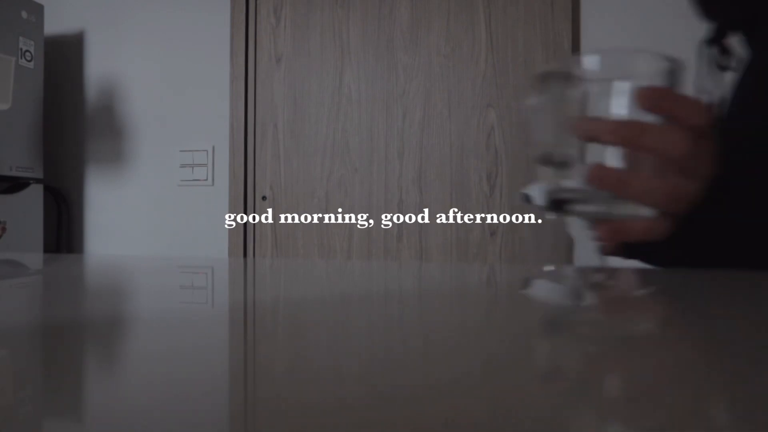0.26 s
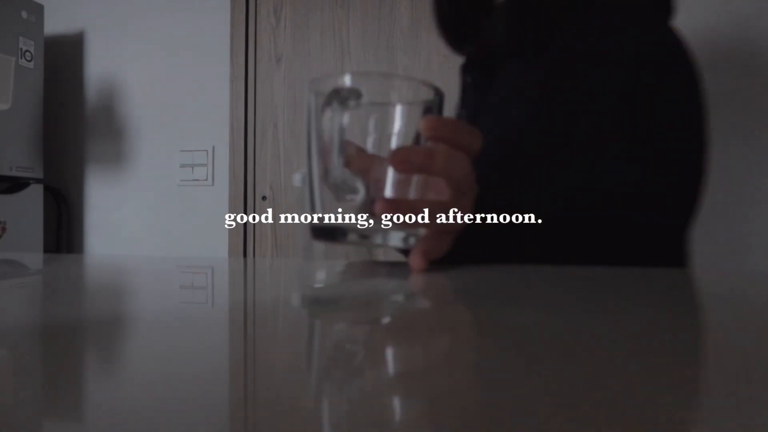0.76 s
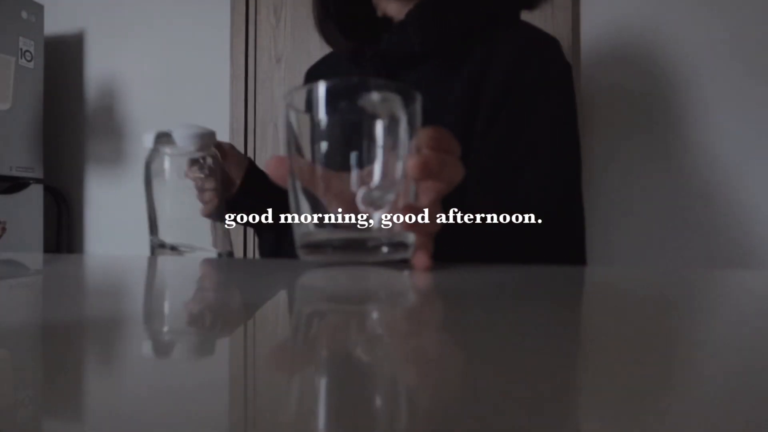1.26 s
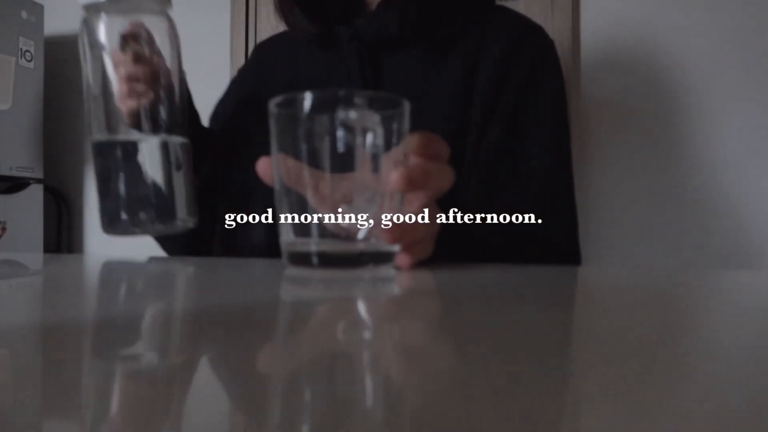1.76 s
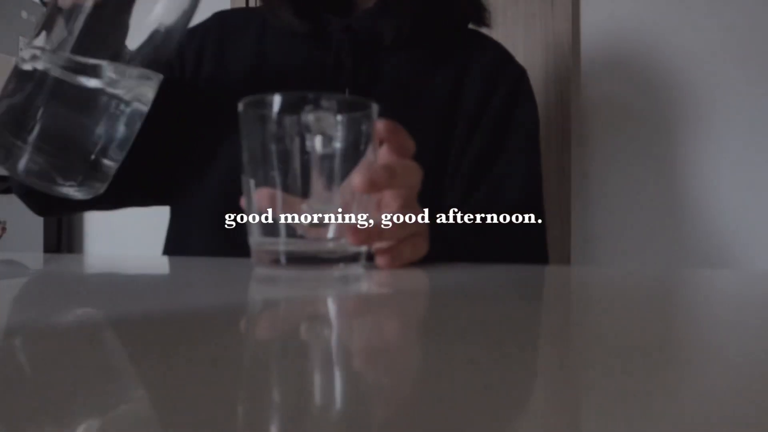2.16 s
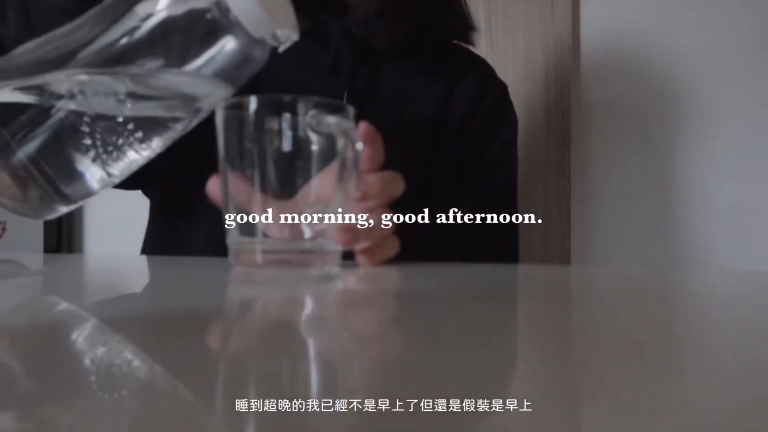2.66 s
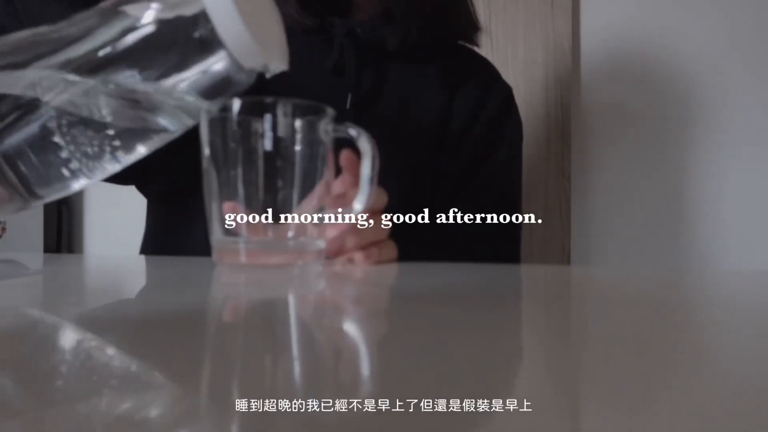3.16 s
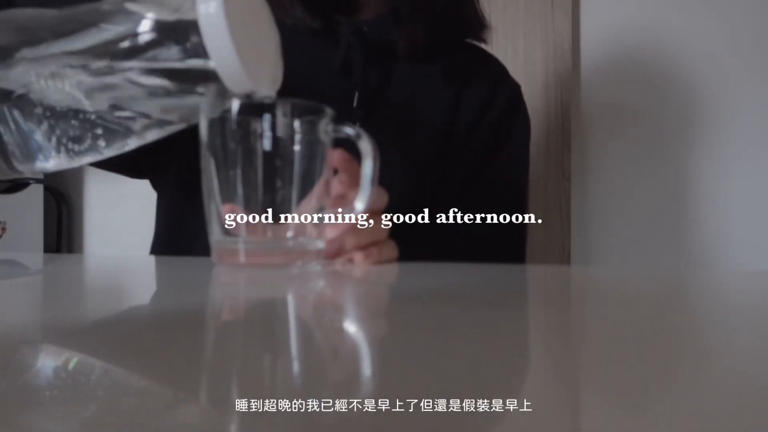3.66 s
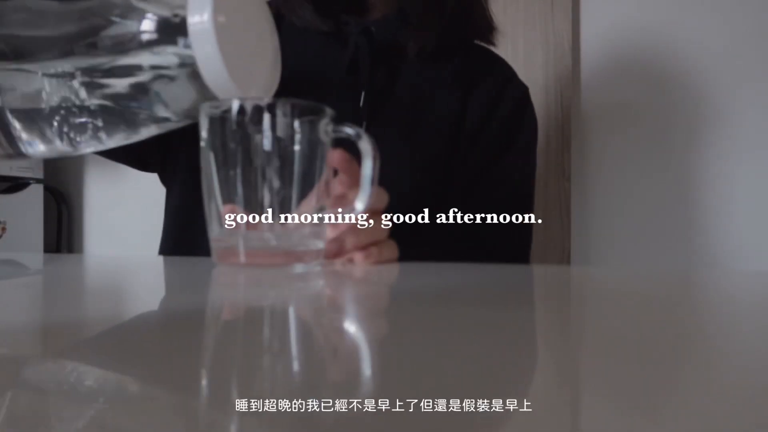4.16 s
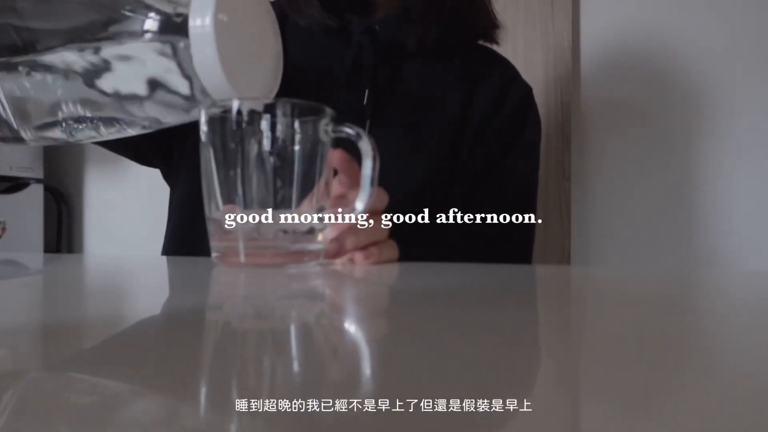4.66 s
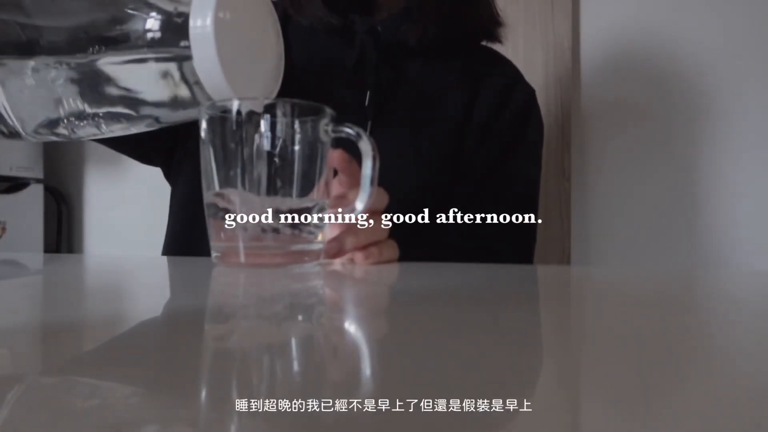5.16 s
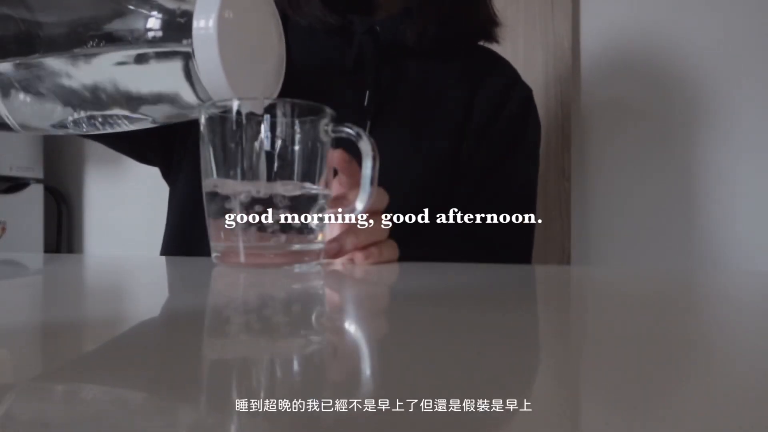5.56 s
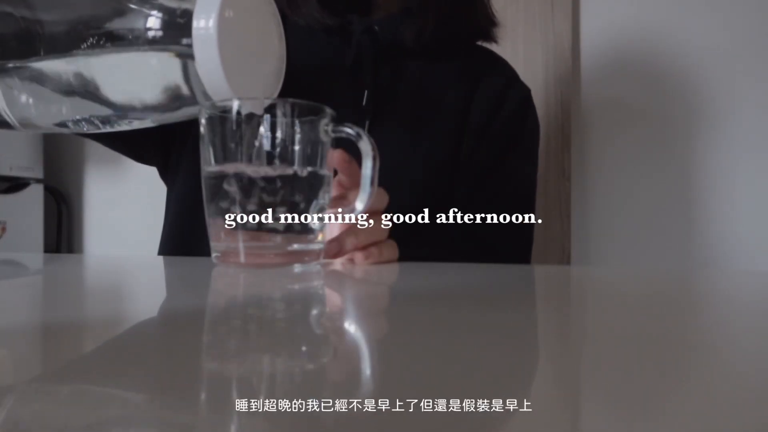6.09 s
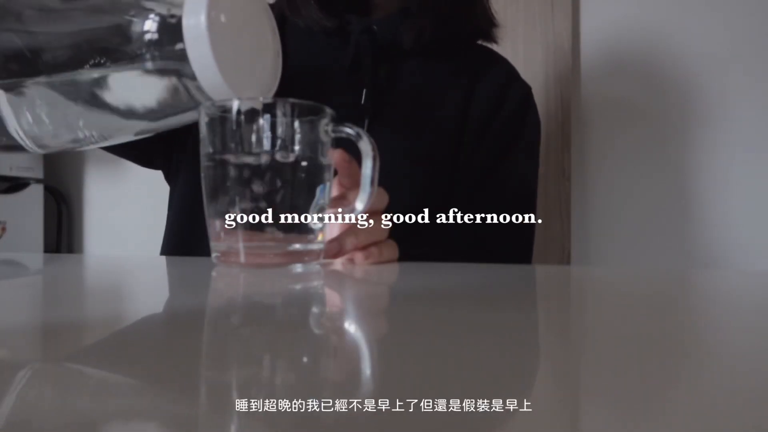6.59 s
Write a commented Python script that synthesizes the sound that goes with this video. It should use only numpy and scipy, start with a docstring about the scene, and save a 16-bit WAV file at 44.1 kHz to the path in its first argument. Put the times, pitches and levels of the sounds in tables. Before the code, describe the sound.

Hard, close glass-on-table knocks, a short dragging scrape, two firm bottle knocks, then a burst of plopping, bubbling water thinning to sparse blips.

```python
"""First a quiet room is heard as soft noise; then a glass mug is knocked down on a hard table top and slid
along the table; then a bottle is set down with two hard knocks. Each touch shakes dying sines in table and
glass, and many tiny slips make the scrape. Then water pours from the bottle: a few gulps, a burst of bubbles
and spray, and sparse bubbles as it fills. Plops are short rising sines with a little noise; the crowd of
bubbles is many small rising sines; the spray is many tiny sines of steady pitch."""
import sys
import numpy as np
from scipy import signal
from scipy.fft import rfft, irfft
from scipy.io import wavfile
from scipy.ndimage import uniform_filter1d

SR = 44100
rng = np.random.default_rng(int(sys.argv[2]) if len(sys.argv) > 2 else 0)


def transcribe(u):
    """Save the signal u as a 16-bit wav file named by the first command-line argument.

    u: samples, shape (n,) or (channels, n), limited to [-1, 1]; the rate is SR.
    q: integer samples, one column per channel.
    """
    v = np.clip(np.atleast_2d(u).T, -1, 1)
    q = np.round(v * 32767).astype(np.int16)
    wavfile.write(sys.argv[1], SR, q)


N = 301203  # length of the scene [samples]


def amp(db):
    """Turn decibels into a plain multiplier."""
    return 10 ** (np.asarray(db) / 20)


def evened(x):
    """Scale a sound to an average (RMS) level of 1."""
    return x / np.sqrt(np.mean(x ** 2) + 1e-20)


def read(points, hz):
    """Read a (pitch, value) table at any pitch, in even steps of octaves."""
    f, value = np.transpose(points)
    return np.interp(np.log(hz + 1), np.log(f + 1), value)


def curve(rows, column):
    """Draw a dB column over the whole scene, at -120 dB outside its rows."""
    rows = np.array(rows)
    return np.interp(np.arange(N) / SR, rows[:, 0], rows[:, column], -120, -120)


def add(mix, s, sound):
    """Add a sound to the mix, starting at s seconds."""
    part = mix[round(s * SR):][:len(sound)]
    part += sound[:len(part)]


def low(x, hz, order):
    """Keep what lies below a pitch."""
    return signal.sosfilt(signal.butter(order, min(hz, 20000), fs=SR, output="sos"), x)


def band(x, lo_hz, hi_hz):
    """Keep what lies between two pitches."""
    return signal.sosfilt(signal.butter(2, [lo_hz, min(hi_hz, 20000)], "band", fs=SR, output="sos"), x)


def ring(modes, extra_db=0, swap=1):
    """Sum of dying sines; a negative swap starts neighbours in opposite directions."""
    hz, db, t60 = np.transpose(modes)[:, :, None]
    t = np.arange(SR // 2) / SR
    sign = swap ** np.arange(len(modes))[:, None]  # a swap smaller than 1 also weakens later rows
    level = amp(db + np.reshape(extra_db, (-1, 1)) - 60 * t / t60)
    return (sign * level * np.sin(2 * np.pi * hz * t)).sum(0)


def bursts(per_s, spread_db):
    """Random single-sample pushes, uneven in size, at an average rate per second."""
    size = amp(spread_db * np.minimum(rng.exponential(1, N), 4))
    return size * (rng.random(N) < per_s / SR)


# Tone colour of the room noise: (pitch [Hz], relative level [dB])
AIR_COLOUR = [(12, -37), (20, -24), (48, -1), (169, -3), (212, -3), (297, -4.5), (361, -3), (1020, -14),
              (1510, -15.5), (1690, -16.5), (2970, -20.5), (8650, -32.5), (13900, -41), (15600, -55),
              (16500, -74)]
# How alike left and right are in that noise: (pitch [Hz], likeness [0 to 1])
AIR_LIKENESS = [(60, 1), (180, 0.61), (550, 0.18), (1650, 0.38), (4970, 0.51), (15000, 0.2)]
AIR_DB = -48  # average level of the noise


def air():
    """Room noise: random short-time spectra with faint patches."""
    frames, hz = N // 256 + 5, np.fft.rfftfreq(1024, 1 / SR)
    a, b, c, d, patches = rng.standard_normal((frames, 513, 5)).T
    patches = evened(uniform_filter1d(uniform_filter1d(patches, 10, 0), 14, 1))
    same = np.clip(read(AIR_LIKENESS, hz), -1, 1)[:, None]
    left = a + 1j * b
    right = same * left + np.sqrt(1 - same ** 2) * (c + 1j * d)
    spectra = np.array([left, right]) * amp(read(AIR_COLOUR, hz)[:, None] + 0.3 * patches)
    noise = signal.istft(spectra, nperseg=1024, noverlap=768)[1][:, :N]
    return amp(AIR_DB) * evened(noise)


# Glass meets table; the last two knocks set the bottle down:
# (time [s], blow [dB], tilt to the bass [dB per octave], thump [dB],
# ring of mug base [dB], ring of mug wall [dB], ring of bottle [dB], click [dB], chatter [dB])
# All levels after the blow are relative to it.
KNOCKS = [(1.3616, 2.5, -0.5, -3.5, -17.5, -47, -72, -38, -65),
          (1.6169, -5, 5, -9.5, -62, -54, -90, -62, -64),
          (1.6931, -3.5, 4.5, -7.5, -60, -51, -90, -60, -64),
          (1.7179, -10, 2.5, 9, -44, -42, -90, -54, -53),
          (1.85, -12.5, 10.5, -15.5, -32, -58, -90, -55, -60),
          (1.88, -19.5, 12, -19, -29, -51, -92, -67, -53), (1.915, 7, -2, -10, -16.5, -34.5, -82, -13, -52),
          (2.6052, -11, 4.5, -7, -45, -29, -57, -27, -60),
          (3.5184, 3.5, 5.5, -11.5, -51, -26.5, -41.5, -20.5, -51),
          (3.8296, 5.5, 3, -7.5, -55, -48, -43, -42, -34)]
# Ways the table top shakes: (pitch [Hz], level [dB], time to fall 60 dB [s])
TABLE_MODES = [(130, -11, 0.076), (187, -3.5, 0.23), (264.3, -2, 0.27), (321, 4.5, 0.077),
               (447.5, 8, 0.031), (481.4, 2.5, 0.14), (552.4, 1, 0.21), (569, 6, 0.033), (750, 11, 0.012),
               (946, -1, 0.09), (1050, -1, 0.049), (1297, 5.5, 0.0088), (1574, 5, 0.042), (1800, -3, 0.073),
               (2150, 14.5, 0.0059), (2620, 9.5, 0.0049), (3000, -8, 0.011), (3360, 3.5, 0.0063),
               (4070, -10, 0.0056)]
# Ways the dry mug rings, base first, then wall, then rim: (pitch [Hz], level [dB], time to fall 60 dB [s])
MUG_MODES = [(1760, 0, .1), (1958, 0, .25), (3494, -12, .12), (3975, -1, .05), (5990, 0, .4),
             (12460, -18, .25)]
# Ways the bottle rings: (pitch [Hz], level [dB], time to fall 60 dB [s])
BOTTLE_MODES = [(255, -0.5, 1), (755, 25, 0.039), (1566, 23, 0.05), (2574, 23.5, 0.02), (2740, 8, 0.03),
                (3143, 4.5, 0.085), (3925, 3.5, 0.042), (4150, -4.5, 0.11), (4590, -9, 0.16),
                (5040, -17, 0.17), (4900, -6, 0.12), (5450, -13, 0.17), (6000, -12, 0.14)]
# Ring of the bottle as it chatters: (pitch [Hz], level [dB], time to fall 60 dB [s])
NECK_MODES = [(5850, -22, 0.32)]
THUMP_HZ = 340  # table modes below this carry the thump
# A harder blow makes a shorter, brighter contact: its top pitch at a 0 dB blow, and octaves up per dB
HARD_HZ, HARD_OCT_PER_DB = 2500, 0.0791
CONTACT_S = 0.00075  # the blow takes about this long to build
RIM_DB = -41  # level of the rim, relative to the click
# First wave through the table: level, final pitch with no tilt, octaves down per dB of tilt, swell time
FRONT_DB, FRONT_HZ, FRONT_OCT_PER_DB, FRONT_S = -14.5, 898, 0.11, 0.00065


def first_wave(t, bass_db):
    """High waves run ahead through the table top, so the first wave sweeps down in pitch."""
    u = t / FRONT_S
    front_hz = FRONT_HZ * 2 ** (-FRONT_OCT_PER_DB * bass_db)
    turns = front_hz * (t + 1.41 * FRONT_S * (1 - np.exp(-u)))
    return amp(FRONT_DB) * u * np.exp(1 - u) * np.sin(2 * np.pi * turns)


def knocks():
    """Each blow shakes the table through a soft contact; the glass rings, clicks and chatters."""
    out, mug = np.zeros((2, N))
    table_hz = np.array(TABLE_MODES)[:, 0]
    t = np.arange(SR // 2) / SR
    for s, db, bass_db, thump_db, base_db, wall_db, bottle_db, click_db, chatter_db in KNOCKS:
        hard_hz = HARD_HZ * 2 ** (HARD_OCT_PER_DB * db)
        rim_db = click_db + RIM_DB
        place_db = rng.standard_normal(len(TABLE_MODES))  # every spot drives the modes differently
        place_db += thump_db * (table_hz < THUMP_HZ) - bass_db * np.log2(table_hz / 700)
        table = ring(TABLE_MODES, place_db, swap=-0.93)
        table *= 1 + 8 * np.exp(-t / 0.0054)  # the first waves leave strongest
        table *= 1 - np.exp(-(t / CONTACT_S) ** 2)  # the contact builds up
        table = low(table, hard_hz, order=3)
        table *= 3.34 / np.linalg.norm(table[:600])  # same strength at the start, before the blow level

        mug_ring = ring(MUG_MODES, [base_db, wall_db, rim_db, rim_db, rim_db, rim_db])
        mug_ring *= 1 - np.exp(-t / 0.003)  # the mug takes a moment to pick up the blow
        add(mug, s, amp(db) * mug_ring)

        bottle = ring(BOTTLE_MODES, bottle_db) + ring(NECK_MODES, chatter_db)
        bottle *= 1 - np.exp(-t / 0.00033)
        front = low(first_wave(t, bass_db), hard_hz, order=2)
        hiss = band(rng.standard_normal(len(t)), 4700, 8070)
        hiss *= amp(click_db - 60 * t / 0.0021) + amp(chatter_db - 60 * t / 0.051)  # short click, longer chatter
        add(out, s, amp(db) * (table + bottle + front + hiss))
    return band(band(out, 88, 21000), 88, 21000), mug  # the table radiates no deep bass


# How fast the echo dies: (pitch [Hz], time to fall 60 dB [s])
ROOM_DECAY = [(150, 0.28), (500, 0.38), (1500, 0.34), (3000, 0.32), (6000, 0.3), (12000, 0.021)]


def room(x, width=0.082, treble_width=1.0):
    """Echo of sparse random taps, each band dying at its own speed; nearly mono bass, wide treble."""
    taps = np.zeros((2, SR // 2))
    at = np.arange(120, SR // 2 - 20, 20) + rng.integers(0, 20, (2, (SR // 2 - 121) // 20))
    np.put_along_axis(taps, at, rng.choice([-1., 1.], at.shape), 1)
    hz, t, spectra = signal.stft(taps, SR, nperseg=256)
    dying = spectra * amp(-60 * t / read(ROOM_DECAY, hz)[:, None])
    tones = rfft(signal.istft(dying, SR, nperseg=256)[1])
    power = abs(tones) ** 2
    # even out narrow peaks, keep the broad colour
    tones *= np.sqrt(uniform_filter1d(power, size=500) / uniform_filter1d(power, size=40))
    tails = irfft(tones)
    mid, side = tails * np.clip(np.linspace(5, -.5, tails.shape[1]), 0, 1)  # fade out the end
    side = width * side + 0.12 * band(side, 600, 3000) + treble_width * band(side, 4500, 15000)
    tail = np.array([mid + side, mid - side]) / np.linalg.norm(mid)
    return signal.fftconvolve(x[None], tail, axes=1)[:, :N]


# Mug dragged over the table: (time [s], level [dB], glass ring relative to the scrape [dB])
SLIDE = [(2.12, -57.5, -26), (2.3, -51, -28), (2.48, -42, -26), (2.59, -45.5, -5), (2.66, -44, -11),
         (2.75, -46, -16), (2.84, -41.5, -14), (2.94, -54, -5), (3.06, -72, 11.5)]


def slide():
    """Dense small slips, uneven in size, scrape, drive the table and set the mug ringing."""
    slips = bursts(2500, spread_db=2.0) * rng.choice([-1, 1], N)
    tilt_db = 0.5 * np.log2(np.array(TABLE_MODES)[:, 0] / 700)
    table = evened(signal.oaconvolve(slips, ring(TABLE_MODES, tilt_db, swap=-0.97))[:N])
    scrape = evened(band(slips, 280, 3350))
    rub = evened(low(table + 1.42 * scrape, 1820, order=2))
    mug_ring = ring(MUG_MODES, [-8.5, -12.5, -18, -17, -42, -36])
    mug_ring /= np.linalg.norm(mug_ring)
    push = amp(curve(SLIDE, 1) + curve(SLIDE, 2)) * evened(slips)
    glass = signal.oaconvolve(push, mug_ring)[:N]
    return amp(curve(SLIDE, 1)) * rub + glass


def bubble(hz, rise, length):
    """A sine that swells in a cycle or two, climbs in pitch if rise is above 0, and is 60 dB down at length."""
    t = np.arange(4000) / SR
    turns = np.cumsum(hz * 2 ** (rise * np.minimum(t, length))) / SR
    swell = 1 - np.exp(-(t * hz / 1.2) ** 2)
    return swell * amp(-60 * (t / length) ** 1.5) * np.sin(2 * np.pi * turns)


# Loud plops, splashes and clicks of water; some events are several pitches sounding together:
# (time [s], level [dB], starting pitch [Hz], rise [octaves per second])
PLOPS = [(4.115, -24.5, 455, 2), (4.133, -29, 430, 4.3), (4.16, -25.5, 324, 3.6), (4.186, -31.5, 450, 7.8),
         (4.215, -29.5, 707, 15.3), (4.218, -35, 1695, 4.1), (4.304, -39, 2380, 2.8),
         (4.318, -37, 2150, 4.9), (4.34, -41, 2150, 3.3), (4.36, -40, 2530, 3.3), (4.374, -29.5, 2150, 1.9),
         (4.374, -34, 2410, 2.2), (4.374, -30, 2660, 1.6), (4.42, -33, 2095, 2), (4.434, -36, 1110, 2.6),
         (4.449, -39, 2090, 3), (4.458, -48, 1260, 5.3), (4.468, -46, 1500, 5.2), (4.484, -34, 2003, 4),
         (4.52, -41, 1580, 3.9), (4.528, -29, 2690, 2.9), (4.538, -38, 1520, 3), (4.55, -37, 2000, 3),
         (4.569, -35.5, 2800, 2.1), (4.573, -30, 1120, 1.9), (4.586, -32, 1014, 3), (4.59, -39, 2070, 3),
         (4.608, -38, 2740, 2), (4.626, -36, 2210, 3), (4.628, -28.5, 1610, 2.2), (4.664, -41, 2620, 3),
         (4.674, -26, 990, 2.7), (4.685, -32, 1105, 3), (4.712, -22.5, 1020, 2.4),
         (4.724, -23.5, 1060, 1.8), (4.725, -26, 1430, 2.9), (4.726, -38, 1880, 3), (4.75, -29, 1520, 4.7),
         (4.749, -14, 1030, 1.1), (4.77, -22.5, 933, 5.2), (4.78, -37, 1940, 6.6),
         (4.8035, -12.5, 890, 0.51), (4.809, -34, 1470, 3.6), (4.813, -26, 880, 2.3),
         (4.851, -25, 790, 1.6), (4.925, -48, 2290, 2.4), (4.95, -44, 1920, 3), (4.99, -44, 1670, 5),
         (4.995, -42, 990, 4.5), (4.997, -40.5, 2830, 3), (5.02, -44, 2900, 3), (5.081, -41, 1370, 2.7),
         (5.126, -41.5, 2860, 3), (5.155, -49, 1800, 2.5), (5.158, -42.5, 750, 4.1),
         (5.185, -39, 1080, 2.8), (5.187, -40.5, 2850, 13), (5.187, -42, 3310, 3.8), (5.221, -41, 970, 3),
         (5.221, -46, 1800, 3), (5.222, -39, 750, 3.8), (5.325, -44, 2320, 3), (5.326, -38, 3050, 1.8),
         (5.361, -36, 2990, 2.1), (5.391, -32.5, 1380, 4), (5.391, -35, 1760, 3.3), (5.391, -33, 1050, 2.8),
         (5.489, -44.5, 2850, 2.7), (5.551, -48, 1930, 2.5), (5.55, -42, 1100, 2.5),
         (5.812, -36, 1980, 1.8), (5.827, -39, 1770, 2), (5.827, -41.5, 1220, 3), (5.987, -43.5, 1900, 3.2),
         (6.086, -35, 1210, 7.9), (6.106, -32, 1302, 11), (6.075, -50, 2830, 3), (6.128, -46, 1830, 51),
         (6.153, -42, 1460, 3.3), (6.34, -40, 1880, 2.3), (6.651, -42, 1450, 4.7), (6.781, -36, 1610, 5.2)]
# Life of a sine of steady pitch at 1 kHz [s], seconds added per octave a second of rise, power of pitch
LIFE_S, LIFE_PER_RISE, LIFE_PITCH = 0.018, 0.0037, -0.017
BURST_OCT = 1.8  # the life ends at the latest after rising this many octaves
TICK_DB, TICK_T60 = -17, 0.015  # rough tick at the start: level relative to the plop, seconds to fall 60 dB


def plops():
    """Loud plops, splashes and clicks: each row is a rising sine with a rough tick and a ragged splash."""
    out = np.zeros(N)
    t = np.arange(1500) / SR
    for (s, db, hz, rise), noise in zip(PLOPS, rng.standard_normal((len(PLOPS), len(t)))):
        life = (LIFE_S + LIFE_PER_RISE * rise) * (hz / 1000) ** LIFE_PITCH
        add(out, s, amp(db) * bubble(hz, rise, min(life, BURST_OCT / rise)))
        tick = evened(band(noise, 0.41 * hz, 1.0 * hz))
        add(out, s, amp(db + TICK_DB - 60 * t / TICK_T60) * tick)
        splash = evened(band(noise, 0.87 * hz, 1.63 * hz))
        splash *= amp(-60 * t / 0.27) * (1 - np.exp(-t / 0.00066))
        splash_db = db - 24.5 + 0.88 * np.log2(hz / 1000)  # high pitches come with more splash than low ones
        add(out, s, amp(splash_db) * splash)
    return out


# Drops bursting on the glass wall: (time [s], level [dB], centre pitch [Hz])
SPITS = [(4.231, -50, 10740), (4.24, -52, 6600), (4.286, -52, 7400), (4.352, -57, 12500),
         (4.437, -50, 6170), (4.6276, -45, 12700), (4.665, -57, 12450), (4.7103, -47, 5270),
         (4.717, -49, 5070), (4.7701, -49, 11600), (5.139, -57, 6000), (5.3254, -48, 5350),
         (5.474, -40.5, 6900)]
WET_RING = 0.56  # water shortens the ring of the mug to this share


def spits():
    """Each drop is a short hiss on the wall that also rings the mug modes close to its pitch."""
    out = np.zeros(N)
    t = np.arange(1500) / SR
    wet_mug = np.array(MUG_MODES) * [1, 1, WET_RING]
    mug_hz, mug_db = wet_mug[:, 0], wet_mug[:, 1]
    for s, db, hz in SPITS:
        hiss = evened(band(rng.standard_normal(len(t)), 0.72 * hz, 1.13 * hz))
        add(out, s, amp(db - 60 * t / 0.018) * hiss)
        nearness_db = -300 * abs(np.log2(mug_hz / hz))
        add(out, s, ring(wet_mug, db - mug_db + nearness_db))  # the modes' own levels cancel out
    return out


# Stream of water, levels before clumping:
# (time [s], gurgle level [dB], spray level [dB], pitch of the loudest small bubbles [Hz])
POUR = [(4.15, -56, -72, 2500), (4.3, -56.5, -68, 2620), (4.45, -49.5, -69, 2580), (4.62, -46, -65.5, 2340),
        (4.78, -46.5, -61, 2090), (4.9, -55.5, -79, 1800), (5.2, -51, -82, 1980), (5.6, -58, -69, 1980),
        (6.83, -68, -88, 1780)]
CLUMP_S, BETWEEN = 0.025, 0.4  # how fast a clump thins out [s], and what is left between clumps


def small_bubbles():
    """A crowd of small rising sines at random times, loudest near the pitch set by the stream."""
    crowd = np.zeros(N)
    pitches = np.geomspace(750, 3384, 24)  # [Hz]
    size = bursts(1400, spread_db=2.5)
    kind = rng.integers(0, len(pitches), N)
    loudest_hz = np.interp(np.arange(N) / SR, *np.array(POUR)[:, [0, 3]].T)
    for k, hz in enumerate(pitches):
        share = amp(-5.0 * np.log2(hz / loudest_hz) ** 2)
        crowd += signal.oaconvolve(size * share * (kind == k), bubble(hz, 2.6, 25 / hz))[:N]
    return crowd


def fine_spray():
    """Droplets of each size fall on their own, each a tiny sine of steady pitch."""
    spray = np.zeros(N)
    for hz in np.geomspace(4500, 13000, 8):
        spray += signal.oaconvolve(bursts(400, spread_db=3.5), bubble(hz, 0, 30 / hz))[:N]
    return spray


def water():
    """Plops and spits; small bubbles and spray get louder at each plop and fade between them."""
    single = plops()
    crowd = small_bubbles()
    single += spits()
    spray = fine_spray()
    now, born = np.arange(N) / SR, np.sort(np.array(PLOPS)[:, 0])
    since = now - born[np.maximum(np.searchsorted(born, now) - 1, 0)]  # time from the latest plop
    clumps = BETWEEN + np.exp(-abs(since) / CLUMP_S)
    stream = amp(curve(POUR, 1)) * evened(crowd) + amp(curve(POUR, 2)) * evened(spray)
    return single + clumps * stream


def scene():
    """Mix the direct sounds, slightly stronger on the left, with their room echo and the room noise."""
    blows, mug = knocks()
    solid, wet = blows + slide(), water()
    near = (solid + mug) * amp([[.2], [-.2]]) + wet * amp([[.3], [-.3]])
    to_room = amp(-9.0) * low(solid, 6600, order=2) + amp(-13.5) * wet + amp(-10) * mug
    return near + room(to_room) + air()


def record(dry):
    """Flatten any peaks beyond full scale, then cut the treble above 16650 Hz."""
    held = np.clip(dry, -1, 1)
    treble_cut = signal.firwin(511, 16650, window=("kaiser", 9), fs=SR)
    return signal.oaconvolve(held, treble_cut[None], "same")


dry = scene()
out = record(dry)
transcribe(out)
```